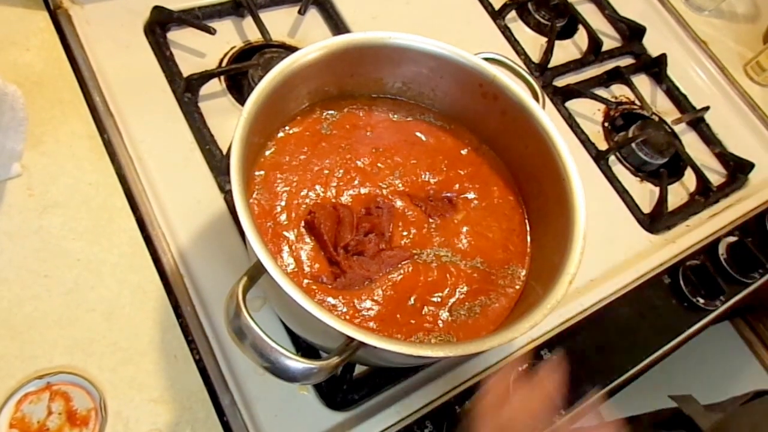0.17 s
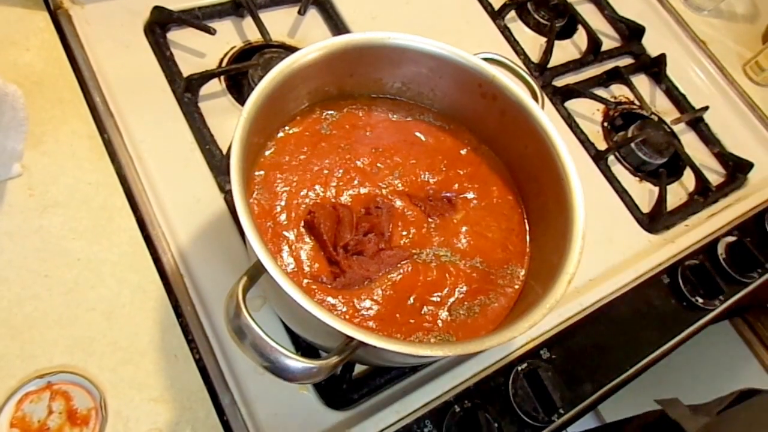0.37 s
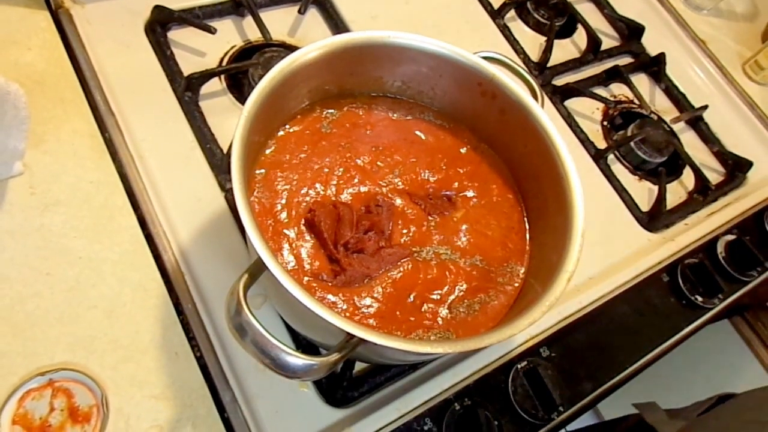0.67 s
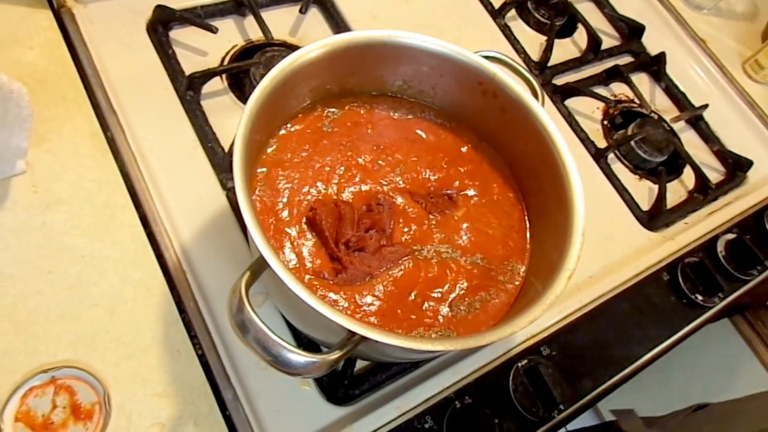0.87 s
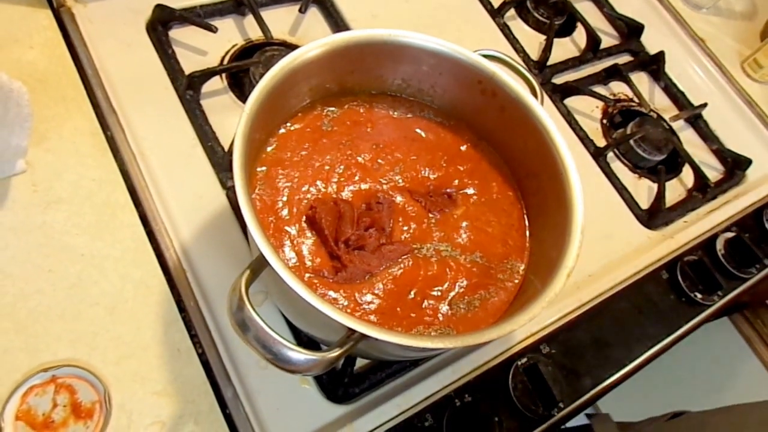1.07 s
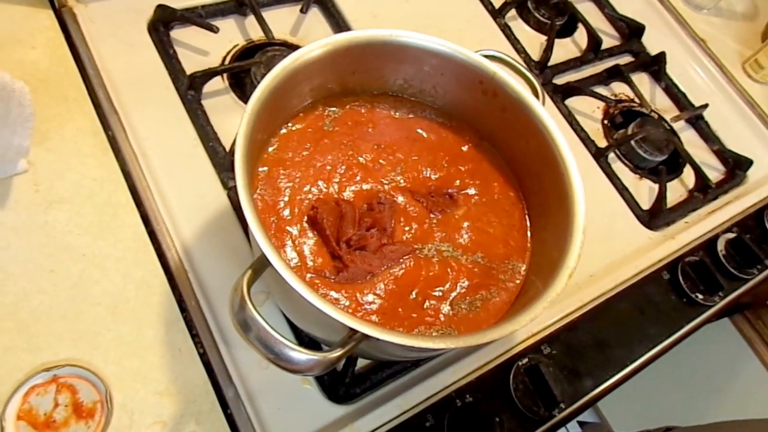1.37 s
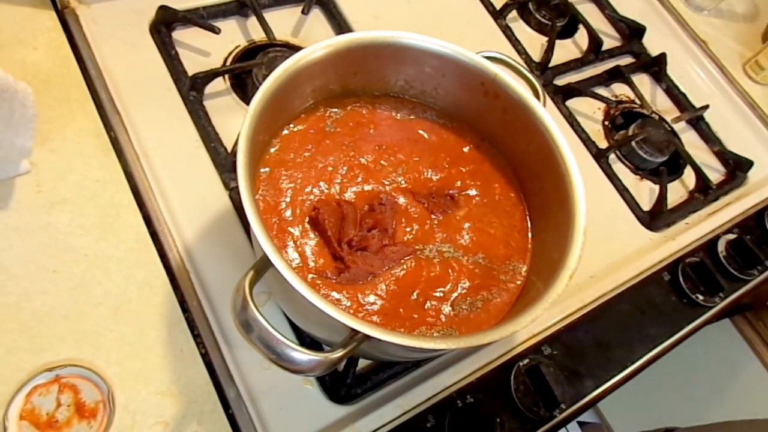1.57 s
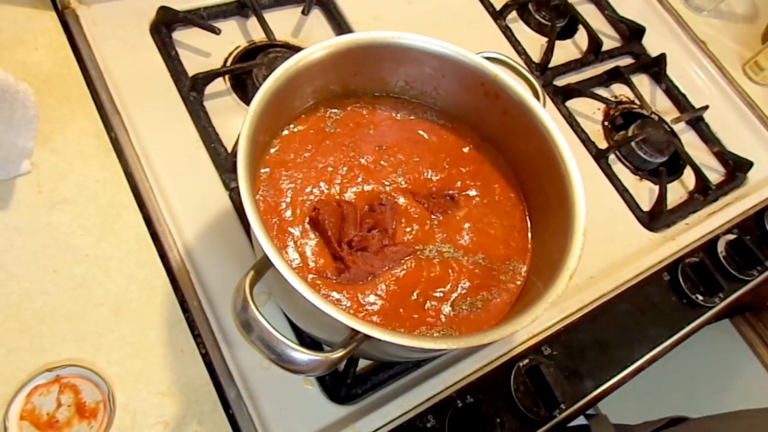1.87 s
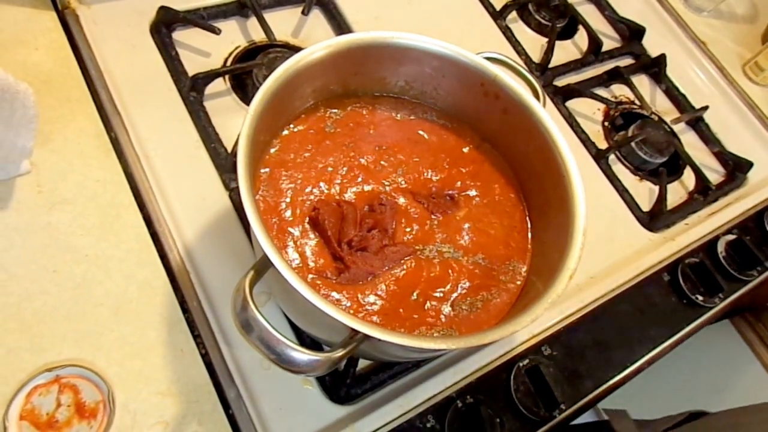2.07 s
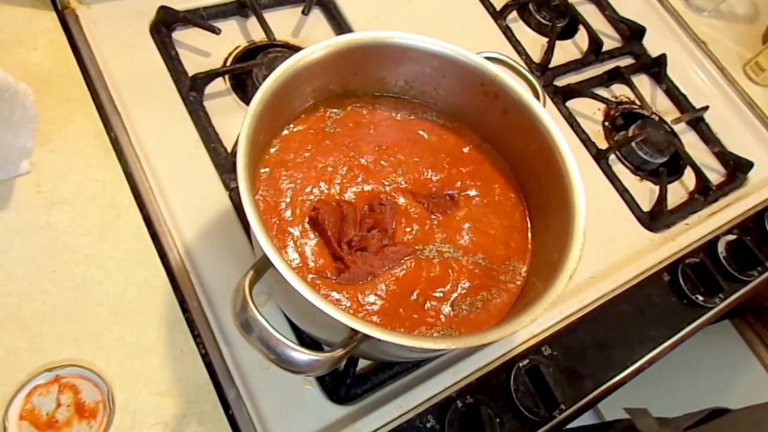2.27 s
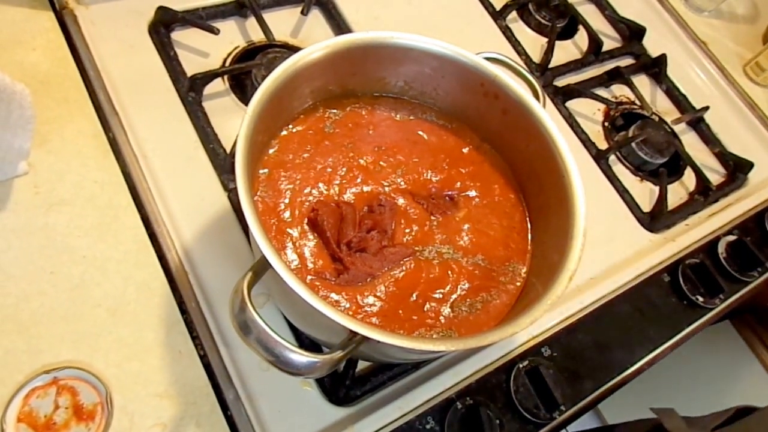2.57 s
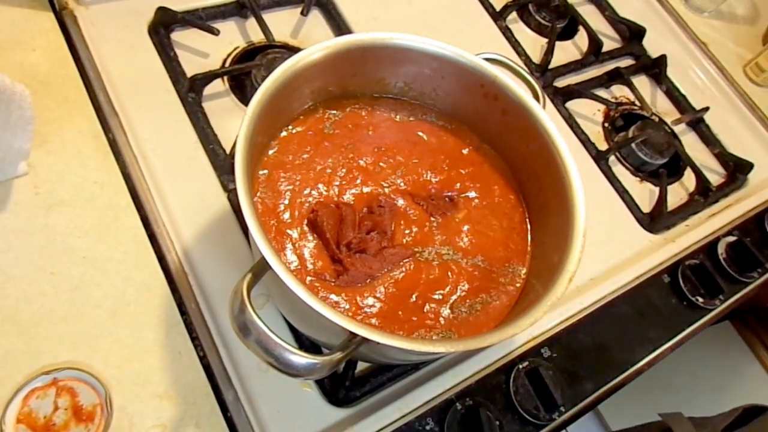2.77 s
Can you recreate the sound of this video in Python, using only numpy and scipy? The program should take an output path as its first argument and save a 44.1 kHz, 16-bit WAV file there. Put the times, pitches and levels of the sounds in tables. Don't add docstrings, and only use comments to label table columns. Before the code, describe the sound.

Irregular bright clinks and dull hollow can knocks, brief gritty blade scrapes, then a loud ringing clank of a knife on a dish with small bounces and a faint rattle, about a metre away in a small live kitchen.

```python
import sys
import numpy as np
from scipy import signal
from scipy.fft import rfft, irfft, next_fast_len
from scipy.io import wavfile
from scipy.ndimage import map_coordinates

SR = 44100
rng = np.random.default_rng(int(sys.argv[2]) if len(sys.argv) > 2 else 0)


def generate_wav(sig):
    pcm = np.round(np.clip(np.atleast_2d(sig).T, -1, 1) * 32767).astype(np.int16)
    wavfile.write(sys.argv[1], SR, pcm)


def ratio_of_db(decibels):
    return 10 ** (np.asarray(decibels, float) / 20)


N = 130095
SIZE = 32768

ROOM_DB = -9.5
SCATTER_DB = 3
CONTACT_HZ = 4580
THUMP_HZ, THUMP_DB = 109, -11


def clinks(sheets, rooms):
    # start_s, peak_db, chatter_s, hardness_db,
    # blade_over_wall_db
    taps = [(.221,-24,0.0051,-11.5,-8),(.270,-9,0.0039,0,6),(.323,-17,0.0091,-3,8),(.435,-38,.008,18,-4),(.568,-40,0.0071,-2,-8),(.703,-13.5,0.008,2,-10),(.714,-18,0.0042,1,-31),
            (.925,-30,0.015,-1,-6),(.943,-26,0.021,4,-4.5),(.96,-28,0.021,-6.5,-5),(1.096,-6.5,0.01,-6,10),(1.108,-9.5,0.011,7,-11),
            (1.182,-19.5,0.0043,7,-1),(1.451,-18.5,0.014,2.5,-9.5),(1.722,-31.5,0.0053,6.5,-14),(1.947,-16.5,0.0037,-4.5,0.5),(1.965,-29,0.0033,-8,-10),(2.11,-33.5,0.0059,-12.5,-6),
                 (2.173,-9.5,0.0093,-2,0),(2.236,-12.5,0.013,-2.5,-5),(2.258,-14,0.007,-7.5,-4),(2.372,-18,0.02,1.5,4.5),(2.424,-17,0.011,-10.5,6.5),(2.487,-16.5,0.0084,4,-6.5)]
    return contacts(taps, clink_ring, sheets, rooms)


def clink_ring(hz, sheet, hard_db, blade_db):
    # pitch_hz, level_db, fade_by_60_db_s
    blade_tones = [(2909,6.5,.06),(4618,8.5,0.044),(6510,0.5,0.061),(8800,-2,0.035),(10920,4,0.032),(13470,9.5,0.042),(14370,0,.04),(4950,-2.5,0.056),(4110,-1.5,0.028),(14800,3,.04)]
    # pitch_hz, level_db, fade_by_60_db_s
    wall_tones = [(1334,-6.5,0.087),(1900,-6.5,0.029),(2424,-3.5,0.049),(3300,-7.5,0.036),(3712,-1.5,0.038),(3855,-1,0.032),(4840,-5,0.039),(8800,-12,.04),(11500,1,0.02),(13260,-1,0.025)]
    ring_db, wash_db, sheet_low_hz = -1, -7.5, 600
    blade = ratio_of_db(blade_db / 2) * modes(blade_tones, hz, SCATTER_DB)
    wall = ratio_of_db(-blade_db / 2) * modes(wall_tones, hz, SCATTER_DB)
    wash = sheet * (1j * hz / (sheet_low_hz + 1j * hz)) ** 2 * (1 + 1j * hz / 9000)
    return soft(hz, CONTACT_HZ * ratio_of_db(hard_db)) * (ratio_of_db(ring_db) * (blade + wall) + ratio_of_db(wash_db) * wash)


def knocks(sheets, rooms):
    # start_s, peak_db, chatter_s, centre_hz
    hits = [(.2395,-3,0.0036,1030),(.25,-15,0.012,950),(.270,-21,0.023,1280),(.329,-22,0.0028,750),(.394,-20,0.013,900),(.421,-19.5,0.022,910),(.455,-17.5,0.0029,1020),(.703,-24,0.011,610),
            (.925,-31,0.03,620),(1.035,-27,0.0048,600),(1.077,-23.5,0.022,600),(1.097,-20,0.029,655),(1.181,-23.5,0.021,710),(1.203,-26.5,0.0023,600),(1.451,-25.5,0.015,665),
            (1.518,-26.5,0.0065,620),(1.623,-25.5,0.0061,644),(1.8635,-21,0.0042,790),(1.885,-24.5,0.016,532),(2.175,-15,0.0079,678),(2.236,-9,0.0065,2840),(2.26,-18,0.063,2640),(2.372,-23,0.015,674),(2.424,-27.5,.008,660),(2.487,-24.5,0.0083,600),
            (.240,-14,0.0068,2100),(.436,-26.5,.008,1510),(.455,-24.5,0.0075,2100),(.546,-38,0.0066,826),(1.557,-34,.006,715),(1.599,-35.5,0.007,640),(1.803,-36,.006,690),(1.864,-31,0.0046,1900),
            (2.795,-32,.006,720),(2.82,-30.5,.01,700),(2.857,-35,0.0073,600),(2.882,-36,.01,715),(2.918,-41,.01,705),(2.94,-37,.01,700)]
    return contacts(hits, knock_body, sheets[::-1], rooms[::-1])


def knock_body(hz, sheet, centre_hz):
    # pitch_hz, level_db, fade_by_60_db_s
    body_tones = [(423.4, -11, 0.032), (538, -1.5, 0.16), (711, -3.5, 0.071), (750, 3.5, 0.046),
                  (835, -1, 0.36), (940, -13, 0.02), (1038, -11, 0.1), (1317, 5.5, 0.07),
                  (1472, 4.5, 0.019), (1680, 1.5, 0.021), (2260, 1.5, 0.02)]
    thud_db, knock_q = -0.5, 1.71
    tin = modes(body_tones, hz, SCATTER_DB) + ratio_of_db(thud_db) * sheet
    counter = ratio_of_db(THUMP_DB - 13.0) * band(hz, THUMP_HZ, 0.89)
    return band(hz, centre_hz, knock_q) * tin + counter


def drag(sheets, rooms):
    starts = [.34, 1.2, 1.47, 1.623, 1.75, 1.885, 2.0, 2.7]
    # length_s, level_db, blade_ring_db
    strokes = [
        (0.15,-44.5,-36),
        (0.07,-46.5,-10),
        (0.14,-41.5,-20),
        (0.083,-36.5,0),
        (0.12,-43,-0.5),
        (0.047,-45,2),
        (0.11,-55,-22),
        (0.2,-47,-43),
    ]
    # pitch_hz, level_db, fade_by_60_db_s
    rubbed_tones = [(2876,2,0.045),(3275,0.5,.05),(4900,-12,.03),(1760,-5.5,0.0067),(3780,-13,0.024)]
    grains_per_s, lumps_per_s, patch_db = 2000, 60, 3
    rise_s, fall_s = 0.0012, 0.036
    can_hz, wall_hz = 620, 1900
    level_db, blade_level_db, wall_db = -1.5, -2, -12.5
    out = np.zeros(N + SIZE)
    t = np.arange(SIZE // 2) / SR
    hz = np.fft.rfftfreq(SIZE, 1 / SR)
    for k, (start, (length, db, blade_db)) in enumerate(zip(starts, strokes)):
        lumps = map_coordinates(rng.standard_normal(40), [t * lumps_per_s])
        push = grit(len(t), grains_per_s) * ratio_of_db(patch_db * lumps)
        push *= np.minimum(t / rise_s, 1) * np.exp(-np.maximum(t - length, 0) / fall_s)
        metal = knock_body(hz, sheets[k], can_hz)
        metal = metal + ratio_of_db(blade_db + blade_level_db) * modes(rubbed_tones, hz, 0)
        metal = metal + ratio_of_db(wall_db) * sheets[k] * band(hz, wall_hz, 1.0)
        z = rfft(push, SIZE) * metal
        loudness = np.sqrt(np.mean(irfft(z)[:int(length * SR) + 9] ** 2))
        gain = ratio_of_db(db + level_db) / loudness
        out[round(start * SR):][:SIZE] += gain * in_room(z, rooms[k % len(rooms)])
    return out[:N]


def drops(sheets, rooms):
    # start_s, peak_db, chatter_s, hardness_db
    falls = [
        (2.593,-3,0.017,-1),
        (2.64,-14.5,0.022,-9.5),
        (2.609,-13,0.0027,-4.5),
        (2.72,-30,0.029,-14),
    ]
    return contacts(falls, dish_ring, sheets, rooms)


def dish_ring(hz, sheet, hard_db):
    # pitch_hz, level_db, fade_by_60_db_s
    dish_tones = [(533,-3,0.068),(756,0,0.07),(1060,-5,0.08),(1315,7,0.13),(1760,0,0.052),(2100,-3,0.034),(3260,0,0.02),(4450,13,0.07),(4603,9,0.031),(5950,11.5,0.045),(6500,-5,0.068),(8059,10,0.16),(8800,5,0.08),(11270,0,0.017)]
    clatter_db = 2.5
    clatter = ratio_of_db(clatter_db) * sheet * (band(hz, 1000, 0.37) + ratio_of_db(-16.0))
    counter = ratio_of_db(THUMP_DB) * band(hz, THUMP_HZ, 0.85)
    return soft(hz, CONTACT_HZ * ratio_of_db(hard_db)) * (modes(dish_tones, hz, 0) + clatter + counter)


def contacts(rows, response, sheets, rooms):
    spikes_per_s, first_blow = 4000, 4.9
    sag_db, release_s = 11, 0.0025
    out = np.zeros(N + SIZE)
    t = np.arange(SIZE // 4) / SR
    hz = np.fft.rfftfreq(SIZE, 1 / SR)
    for k, (start, db, length, *more) in enumerate(rows):
        push = grit(len(t), spikes_per_s) * ratio_of_db(-sag_db * t / length)
        push *= np.exp(-np.maximum(t - length, 0) / release_s)
        push[0] = first_blow
        z = rfft(push, SIZE) * response(hz, sheets[k % len(sheets)], *more)
        loudness = np.sqrt(np.mean(irfft(z)[:SR // 50] ** 2))
        gain = ratio_of_db(db - 12) / loudness
        out[round(start * SR):][:SIZE] += gain * in_room(z, rooms[k % len(rooms)])
    return out[:N]


def grit(count, per_s):
    spike_db = 1.5
    chance = rng.random(count)
    size = np.minimum(rng.exponential(size=count), 2.5)
    spikes = (chance < per_s / SR) * ratio_of_db(spike_db * size)
    return rng.standard_normal(count) * (0.3 + spikes)


def modes(table, hz, scatter_db):
    out = 0
    for k, (centre, db, t60) in enumerate(table):
        width = np.log(1000) / np.pi / t60
        level = (-1) ** k * ratio_of_db(db + scatter_db * rng.standard_normal())
        out = out + level * 1j * hz * width / (centre ** 2 - hz ** 2 + 1j * hz * width)
    return out


def soft(hz, corner_hz):
    return 1 / (1 + 1j * hz / corner_hz) ** 2


def band(hz, centre_hz, q):
    width = centre_hz / q
    return (1j * hz * width / (centre_hz ** 2 - hz ** 2 + 1j * hz * width)) ** 2


def thin_sheet():
    # pitch_hz, fade_by_60_db_s
    sheet_fades = [(300,0.12),(1000,0.075),(4000,0.073),(14000,0.081)]
    return tails(sheet_fades, 0.00065, count=11)


def kitchen():
    # pitch_hz, fade_by_60_db_s
    room_fades = [(150, 0.58), (700, 0.53), (2500, 0.36), (6000, 0.27), (14000, 0.23)]
    wall_delay_s = 0.0028
    return tails(room_fades, wall_delay_s, count=7)


def tails(t60s, onset_s, count):
    noise = rng.standard_normal((count, SR // 2))
    hz, t, z = signal.stft(noise, SR, nperseg=256)
    fade = ratio_of_db(-60 * t / along(t60s, hz)[:, None])
    tail = signal.istft(z * fade, SR, nperseg=256)[1][:, :SR // 2]
    tail = tail * (1 - np.exp(-np.arange(SR // 2) / SR / onset_s))
    return rfft(tail / np.linalg.norm(tail, axis=1, keepdims=True), SIZE)


def in_room(z, room):
    return irfft(z * (1 + ratio_of_db(ROOM_DB) * room))


def hiss():
    # pitch_hz, level_db
    shared_colour = [(25, -19.5), (120, -11), (749, -7.5), (1140, 1), (1550, -12.5), (3800, -15),
                     (9000, -21), (15000, -15.5)]
    # pitch_hz, level_db
    unlike_colour = [(25, -5), (120, -12), (300, -16), (800, -20), (15000, -26)]
    mid = ratio_of_db(-52) * hush(shared_colour)
    side = ratio_of_db(-78) * hush(unlike_colour)
    return np.array([mid + side, mid - side])


def hush(colour):
    noise = filtered(rng.standard_normal(N), lambda hz: ratio_of_db(along(colour, hz)))
    return noise / np.sqrt(np.mean(noise ** 2) + 1e-20)


def along(points, hz):
    f, v = np.transpose(points)
    return np.interp(np.log(hz + 1), np.log(f + 1), v)


def filtered(x, response):
    n = x.shape[-1]
    m = next_fast_len(n + 8192)
    return irfft(rfft(x, m) * response(np.fft.rfftfreq(m, 1 / SR)), m)[..., :n]


def scene():
    # pitch_hz, side_under_mid_db
    apart = [(80,-18),(300,-29),(700,-36),(4000,-24.5),(14000,-19)]
    mic_low_hz = 143
    rooms, sheets = kitchen(), thin_sheet()
    mid = clinks(sheets, rooms) + knocks(sheets, rooms) + drag(sheets, rooms) + drops(sheets, rooms)
    mid = filtered(mid, lambda hz: (1j * hz / (mic_low_hz + 1j * hz)) ** 2)
    side = filtered(mid, lambda hz: 1j * ratio_of_db(along(apart, hz)))
    return np.array([mid + side, mid - side]) + hiss()


def roll_off(x):
    return signal.sosfilt(signal.butter(12, 16330, fs=SR, output="sos"), x)


def record(dry):
    top_hz, resting_level = 14760, -0.00056
    limited = filtered(dry, lambda hz: 1 / (1 + (hz / top_hz) ** 60))
    return roll_off(limited + resting_level)


dry = scene()
out = record(dry)
generate_wav(out)
```